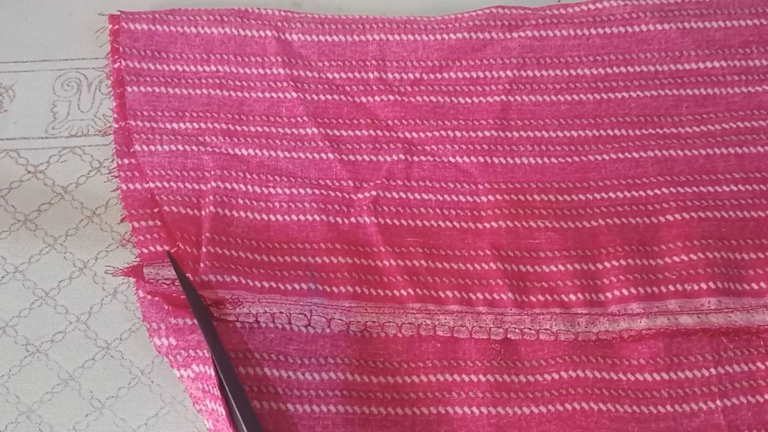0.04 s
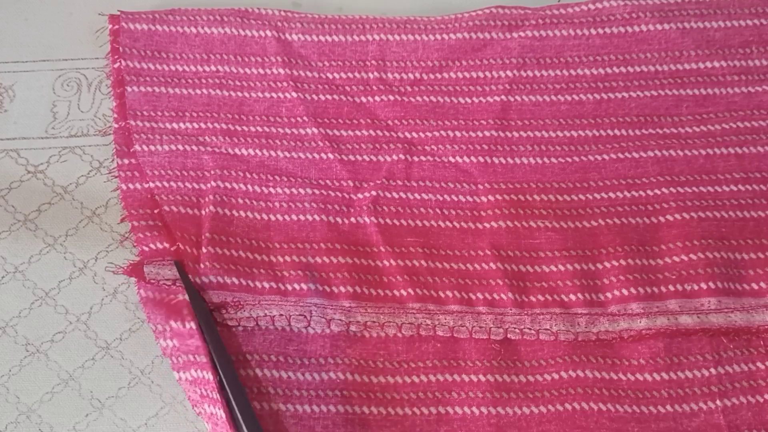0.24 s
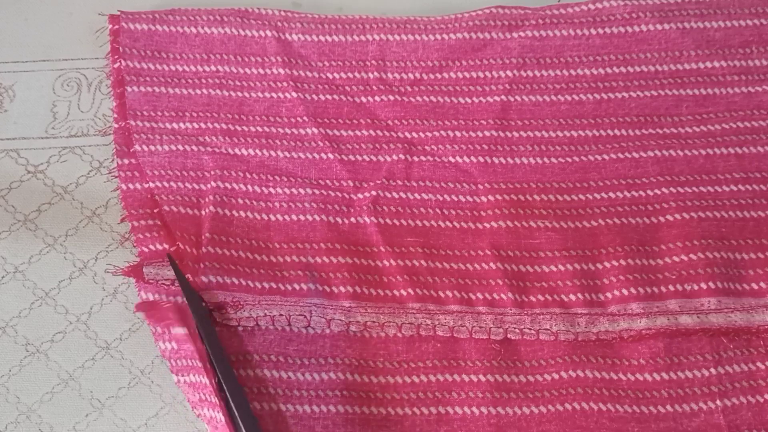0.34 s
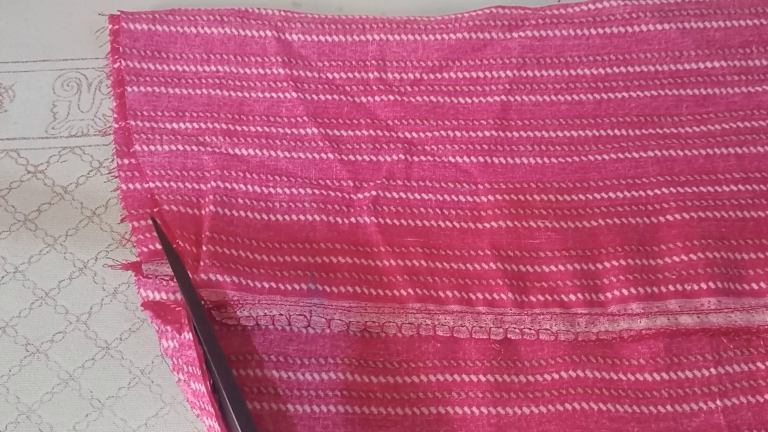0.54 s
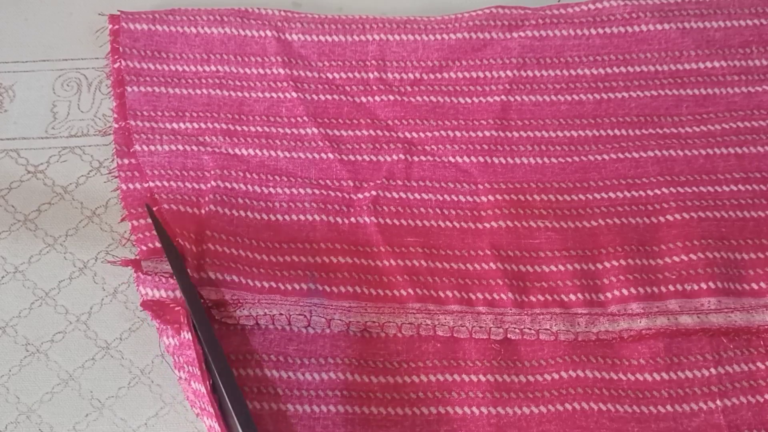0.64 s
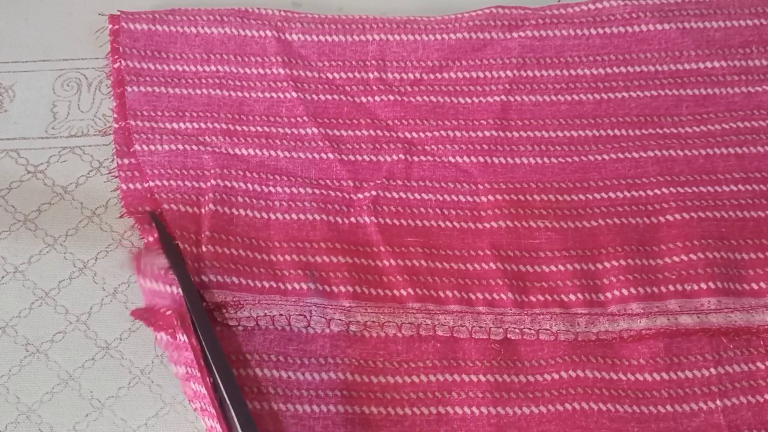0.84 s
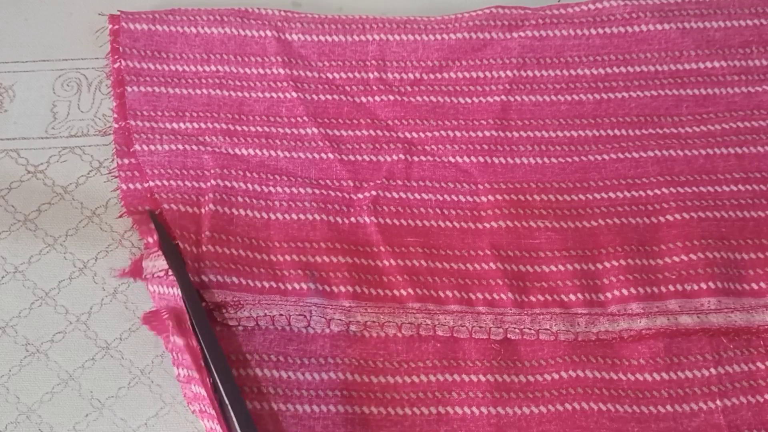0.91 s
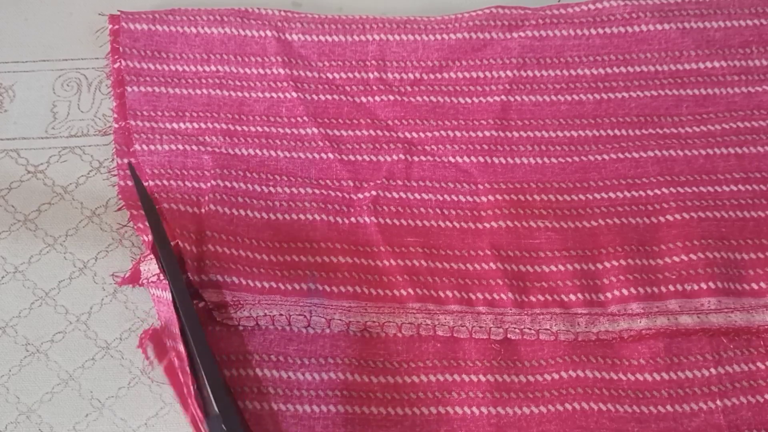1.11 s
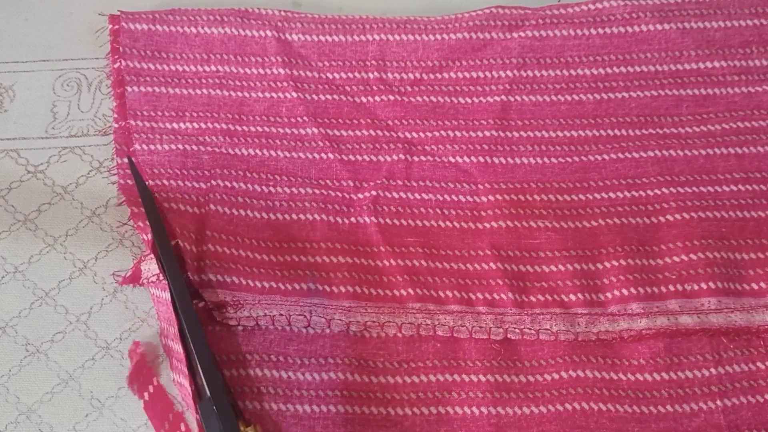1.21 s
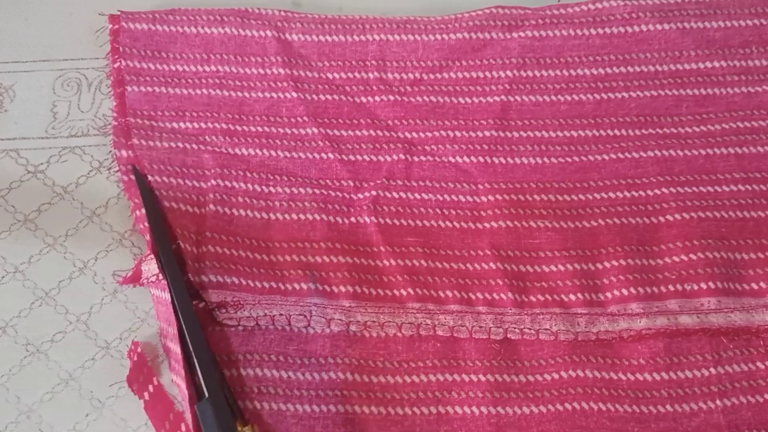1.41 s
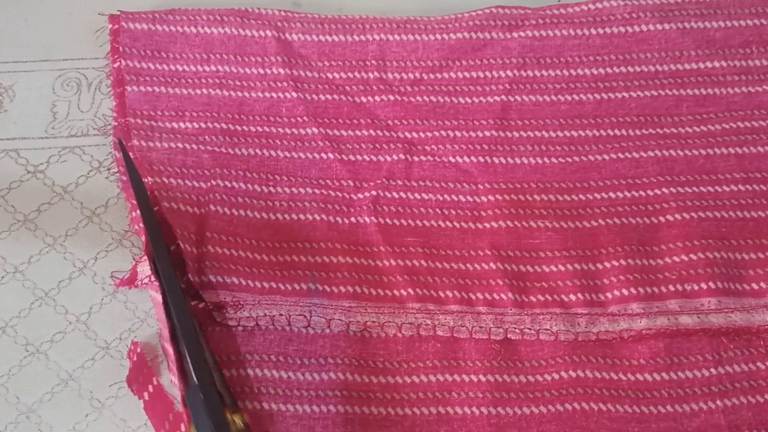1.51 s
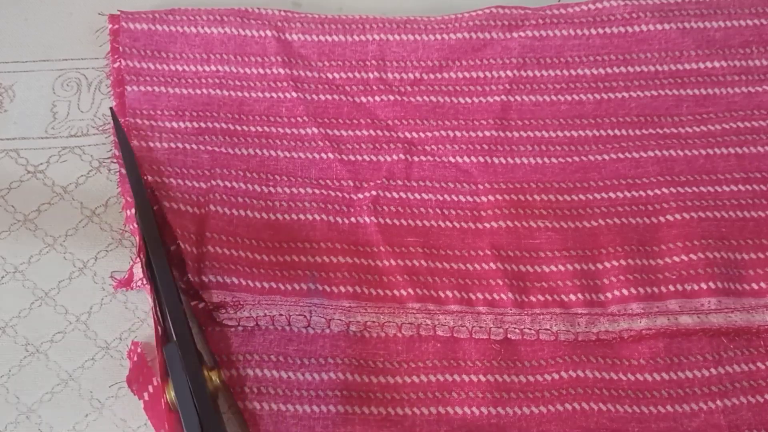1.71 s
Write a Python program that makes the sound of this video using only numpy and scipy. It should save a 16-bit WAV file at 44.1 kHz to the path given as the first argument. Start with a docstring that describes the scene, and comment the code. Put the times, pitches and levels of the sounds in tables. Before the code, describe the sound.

Large steel scissors cut through cloth three times, close by in a small room. Each cut is a crisp, slightly ringing crunch ending in a dull knock on the table, with low rubbing and light ticks between.

```python
"""Large steel scissors cut folded cloth three times, resting on a table in a small room.
The first cut starts at 0.1 s as a run of bites: threads snap, the sliding edges ring the blades,
and the closing knocks the table. The blades open with a faint scrape at 0.4 s and are pushed on,
rubbing the cloth and making the table rumble. The second cut follows at 0.7 s, the third at 1.3 s.
At 1.5 s the blades open once more, two light ticks follow, and the dragging dies down."""
import sys
import numpy as np
from scipy import signal
from scipy.fft import rfft, irfft
from scipy.io import wavfile
from scipy.ndimage import uniform_filter1d

SR = 44100
rng = np.random.default_rng(int(sys.argv[2]) if len(sys.argv) > 2 else 0)


def to_wav(s):
    """Save 16-bit WAV."""
    ch = np.atleast_2d(s).T  # columns
    pcm = np.round(np.clip(ch, -1, 1) * 32767)  # PCM
    wavfile.write(sys.argv[1], SR, pcm.astype(np.int16))


N = 77175
T = np.arange(N) / SR

# bites of the closing blades: t/s, length/s, fade/s, thread level/dB, low ring level/dB,
# main ring level/dB, main ring f/Hz, sizzle level/dB
BITES = [ (0.096, 0.0036, 0.012, -80, -77, -71, 7840, -75),
         (0.124, 0.013, 0.011, -68, -64, -61, 7840, -70.5),
         (0.156, 0.023, 0.0097, -53.5, -58, -57, 7850, -47),
         (.198, 0.011, 0.0047, -54, -48.5, -44, 7720, -47.5),
         (0.211, 0.017, 0.0098, -38, -46.5, -45, 7720, -57),
         (0.275, 0.0087, 0.0036, -40.5, -47.5, -34.5, 7800, -42),
         (0.738, 0.045, 0.0035, -78, -68.5, -63, 7950, -67),
         (0.7843, 0.0027, 0.0011, -43, -49.5, -46, 8160, -68),
         (0.797, 0.037, 0.027, -47.5, -55.5, -61, 8000, -62),
         (0.83, 0.017, 0.0056, -47, -51, -54, 9100, -48),
         (0.876, 0.0092, 0.023, -46, -50, -46.5, 8720, -61),
         (0.894, 0.021, 0.0022, -40.5, -48.5, -45.5, 8970, -40),
         (1.311, 0.012, 0.012, -60, -58, -76, 7500, -57.5),
         (1.331, 0.014, 0.0092, -54.5, -54.5, -61, 9000, -49.5),
         (1.348, 0.018, 0.014, -47.5, -54.5, -43, 9070, -63),
         (1.377, 0.015, 0.0089, -47, -62.5, -40, 8840, -38.5),
         (1.409, 0.0097, 0.0091, -42.5, -57, -44, 9120, -46), ]
# the blades' low ring shifts as their crossing point moves: t/s, f/Hz
LOW_RING_PATH = [(.13, 4316), (.88, 4423), (1.31, 4320), (1.35, 4500), (1.38, 3940)]
# knocks on the table as the blades close: t/s, peak level/dB, contact time/s
KNOCKS = [(.2850, -14.5, 0.002), (.3010, -18, 0.0028), (0.911, -22, 0.0041), (1.371, -32, 0.0013)]
# the blades slide open: peak t/s, rise/s, fall/s, level/dB
OPENINGS = [(0.412, 0.03, 0.032, -70), (1.017, 0.0099, 0.012, -65.5), (1.52, 0.014, 0.016, -63.5)]
# ticks of the pivot and the meeting blades: t/s, level/dB (before halving), fade/s
TICKS = [(0.281, -44.5, 0.0044), (1.162, -36.5, 0.005), (1.584, -46, 0.0023), (1.669, -50.5, 0.0048)]
# scissors and cloth drag on the table: peak t/s, rise/s, fall/s, rumble level/dB, rub level/dB
DRAGS = [ (0.177, 0.025, 0.016, -40.5, -59), (0.22, 0.032, 0.046, -37.5, -53),
         (0.409, 0.072, 0.07, -43, -56), (0.661, 0.09, 0.077, -58.5, -66.5),
         (0.808, 0.04, 0.024, -38, -53.5), (0.848, 0.016, 0.069, -38, -51), (0.906, 0.017, 0.036, -49, -55),
         (1.018, 0.041, 0.083, -44.5, -58), (1.174, 0.014, 0.034, -54, -56.5),
         (1.25, 0.035, 0.023, -46.5, -57.5), (1.327, 0.026, 0.018, -40.5, -60),
         (1.389, 0.029, 0.034, -34, -54), (1.534, 0.059, 0.042, -43, -56),
         (1.578, 0.018, 0.0099, -51.5, -59.5), (1.72, 0.15, 0.63, -59, -71), ]
# the handles buzz: peak t/s, rise/s, fall/s, level/dB
BUZZES = [(0.223, 0.036, 0.0099, -50.5), (0.286, 0.0037, .008, -47), (0.846, 0.013, 0.019, -42),
          (0.909, 0.021, 0.011, -51), (1.251, 0.024, 0.0043, -54.5), (1.397, 0.031, 0.022, -50)]
# the scissors judder on the table: peak t/s, rise/s, fall/s, level/dB, f/Hz
JUDDERS = [(.115, 0.0092, .015, -52, 171), (0.444, 0.05, 0.028, -43.5, 118),
           (0.861, 0.011, 0.019, -33.5, 112), (1.212, 0.027, 0.0091, -38, 116.7),
           (1.436, 0.024, 0.036, -29.5, 124.5)]
# the table's own notes: f/Hz, time to fade by 60 dB/s, relative level/dB
TABLE_NOTES = [(117.2, 0.12, 3), (129.3, 0.039, 3), (171.8, 0.19, -7), (218.6, 0.18, -10.5),
               (323, 0.1, -10), (515, 0.066, -12)]

# Resonances, the pitches at which a part likes to ring: f/Hz, width/Hz, relative level/dB
BLADE_RINGS = [(6570, 200, -16), (9660, 310, -14.5)]  # on either side of the main ring
EDGE_RINGS = [(13750, 980, -4), (15060, 660, -4)]  # the cutting edges
OPENING_RINGS = [(7350, 180, 10.3), (7950, 200, 6.7), (8960, 590, 1.5)]  # the parting blades
HANDLE_RINGS = [(609, 20, -3), (689.4, 30.2, -3)]  # the handles

# Tone curves, how strong a sound is from low to high: f/Hz, relative level/dB
THREAD_TONE = [(1700, -11.5), (2500, -9), (3900, -2), (5600, -2.5), (6800, 7), (8500, 4.5), (10000, -6),
               (11000, -12), (12200, -28), (13000, -20), (15500, -1.5)]  # snapping threads
SCRAPE_TONE = [(2000, -18), (3900, 10), (6000, 4), (11500, -12), (14500, 4)]  # steel sliding on steel
CLOTH_TONE = [(270, 2.5), (350, 4), (500, -3), (780, -6.5), (1100, -12), (1600, -18), (2200, -20.5)]  # rubbing cloth
FIBRE_TONE = [(2300, -10), (3800, -2.5), (8000, -12.5), (11500, -19), (15000, -14)]  # the hiss of its fibres
ECHO_TONE = [(60, -33), (250, -8), (700, 2), (2500, 4.5), (8000, -1.5), (15000, -6)]  # the room's echo
QUIET_TONE = [(35, -3), (70, 1), (115, 4.5), (350, -6), (700, -21.5), (4000, -24), (15500, -36.5)]  # the room's background noise
TICK_TONE = [(400, 19), (800, 5), (2500, -11), (7000, -16.5), (15000, -41)]
RUMBLE_TONE = [(45, 2), (85, -15.5), (115, -0.5), (700, -16)]

CLICKS_PER_S, CLICK_SCATTER_DB = 9000, 4
BITE_ATTACK_S, BITE_SWELL_DB = 0.003, 10  # pressure grows through a bite
SIZZLE_POWER = 1.4  # the sizzle grows faster than the pressure
LOW_WIDTH_HZ, MAIN_WIDTH_HZ = 210, 176
REST_HZ, WIDENING = 7900, 0.33  # the main ring widens by this much per Hz above its rest
OVERTONE_RATIO, OVERTONE_WIDTH_HZ, OVERTONE_DB = 1.68, 100, -13  # climbs with the main ring
RIPPLE_DB, RIPPLE_SPACING_HZ = 9, 168.5
OPENING_RING_DB, FIBRE_DB = 3.5, -12.5  # compared with the scrape and with the cloth
TABLE_LOW_HZ = 87  # the table gives off little sound below this
ECHO_S, ECHO_DB, QUIET_DB = 1, -13, -66  # the echo fades by 60 dB in ECHO_S
RING_ECHO_SHARE = 0.048  # the thin rings carry less far into the room


def cutting():
    """In each bite threads snap and the blades ring, harder and harder until the cloth gives."""
    snaps = colour(crackle(), THREAD_TONE)
    sizzle = resonate(crackle(), EDGE_RINGS)
    friction = crackle()
    crunch, rings = 0, 0
    for at, length, fade, snap_db, low_db, main_db, main_hz, sizzle_db in BITES:
        t = T - at
        pressure = np.clip(t / BITE_ATTACK_S, 0, 1)
        pressure *= undb(BITE_SWELL_DB * (np.clip(t / length, 0, 1) - 1))
        pressure *= np.exp(-np.maximum(t - length, 0) / fade)  # the cloth gives
        low_hz = np.interp(at, *np.array(LOW_RING_PATH).T)
        low_ring = steady(resonate(friction, [(low_hz, LOW_WIDTH_HZ, 0)]), span_s=0.012)
        width = MAIN_WIDTH_HZ + WIDENING * max(main_hz - REST_HZ, 0)
        overtone = (main_hz * OVERTONE_RATIO, OVERTONE_WIDTH_HZ, OVERTONE_DB)
        resonances = BLADE_RINGS + [(main_hz, width, 0), overtone]
        main_ring = steady(resonate(friction, resonances), span_s=0.0084)
        crunch += pressure * undb(snap_db) * steel_ripple(snaps)
        crunch += pressure ** SIZZLE_POWER * undb(sizzle_db) * sizzle
        rings += pressure * (undb(low_db) * low_ring + undb(main_db) * main_ring)
    return crunch, rings


def steel_ripple(x):
    """The steel's many small resonances make some pitches louder and others softer, at random."""
    f = np.arange(N // 2 + 1) * SR / N
    heights = rng.standard_normal(512)
    ripple_db = RIPPLE_DB * np.interp(f / RIPPLE_SPACING_HZ, np.arange(len(heights)), heights)
    return unit(irfft(rfft(x) * undb(ripple_db), N))


def knocks():
    """The closing scissors push on the table and ring it; a longer contact sounds duller."""
    ring, out = table_ring(), 0
    for at, db, contact in KNOCKS:
        push = np.sin(np.pi * np.clip((T - at) / contact, 0, 1))
        thud = signal.fftconvolve(push, ring)[:N]
        out += undb(db) * thud / np.abs(thud).max()
    return out


def table_ring():
    """After one sharp push the table sounds a few low notes that quickly fade."""
    ring = sum(undb(db) * np.sin(2 * np.pi * hz * T) * die_away(fade) for hz, fade, db in TABLE_NOTES)
    return cut_bass(ring, TABLE_LOW_HZ, order=2)


def opening():
    """As the blades part, steel slides lightly on steel and sings faintly."""
    scrape = unit(colour(crackle(), SCRAPE_TONE))
    ring = undb(OPENING_RING_DB) * resonate(crackle(), OPENING_RINGS)
    return swells(OPENINGS) * (scrape + ring)


def ticks():
    """The pivot and the meeting blades tick: sudden, very short bursts of noise."""
    loudness = sum(undb(db) * (T > at) * np.exp(-np.abs(T - at) / fade) for at, db, fade in TICKS)
    return loudness * steady(colour(crackle(), TICK_TONE), span_s=0.0026) / 2


def dragging():
    """The table rumbles and the cloth rubs as the scissors are pushed along."""
    weight = swells((at, rise, fall, db) for at, rise, fall, db, _ in DRAGS)
    rub = swells((at, rise, fall, db) for at, rise, fall, _, db in DRAGS)
    shaking = signal.fftconvolve(rng.standard_normal(2 * N), table_ring())[N:2 * N]
    rumble = steady(colour(shaking, RUMBLE_TONE), span_s=0.0357)
    cloth = steady(colour(crackle(), CLOTH_TONE), span_s=0.078)
    fibres = undb(FIBRE_DB) * unit(colour(crackle(), FIBRE_TONE))
    return weight * rumble + rub * (cloth + fibres)


def judder():
    """The juddering scissors keep one low note of the table swinging: it swells and dies."""
    return sum(undb(db) * swell(at, rise, fall) * np.sqrt(2) * np.sin(2 * np.pi * hz * (T - at))
               for at, rise, fall, db, hz in JUDDERS)


def handle_buzz():
    """The handles buzz when pressed hard, jolted or shifted in the hand."""
    return swells(BUZZES) * steady(resonate(crackle(), HANDLE_RINGS), span_s=0.025)


def room_echo(x):
    """The room's many reflections blur into one short, fading tail."""
    tail = rng.standard_normal(N) * die_away(ECHO_S) * np.clip(T / 0.0043, 0, 1)
    echo = signal.fftconvolve(x, tail / np.linalg.norm(tail))[:N]
    return undb(ECHO_DB) * colour(echo, ECHO_TONE)


def room_quiet():
    """A faint, low, even noise fills the room."""
    return undb(QUIET_DB) * unit(colour(rng.standard_normal(N), QUIET_TONE))


def crackle():
    """Thousands of tiny clicks a second, each of a random size."""
    hits = rng.random(N) < CLICKS_PER_S / SR
    signs = np.sign(rng.standard_normal(N))
    return hits * signs * undb(CLICK_SCATTER_DB * np.minimum(rng.exponential(size=N), 5))


def colour(x, tone):
    """Shape a sound with a tone curve, falling steeply beyond its ends."""
    hz, db = np.array(tone, float).T
    f = np.maximum(np.arange(N // 2 + 1) * SR / N, 1)
    falloff = np.minimum(f / hz[0], 1) ** 4 * np.minimum(hz[-1] / f, 1) ** 4
    return irfft(rfft(x) * falloff * undb(np.interp(np.log(f), np.log(hz), db)), N)


def resonate(x, resonances):
    """Let a sound ring at each resonance; the sum has an average strength of 1."""
    out = 0
    for hz, width, db in resonances:
        b, a = signal.iirpeak(min(hz, .45 * SR), hz / (2 * width), fs=SR)
        out += undb(db) * signal.lfilter(b, a, signal.lfilter(b, a, x))  # twice, for steep sides
    return unit(out)


def cut_bass(x, hz, order):
    """Weaken everything below hz; a higher order cuts more steeply."""
    return signal.sosfilt(signal.butter(order, hz, "high", fs=SR, output="sos"), x)


def steady(x, span_s):
    """Even out swells in a noise that are slower than span_s."""
    return x / np.sqrt(uniform_filter1d(x ** 2, max(int(span_s * SR), 2)) + 1e-12)


def swell(at, rise, fall):
    """A smooth rise to 1 at a given moment, then a fall."""
    distance = (T - at) / np.where(T < at, rise, fall)
    return np.exp(1 - np.hypot(distance * 1.566, 1))


def swells(rows):
    """Add several swells into one loudness curve."""
    return sum(undb(db) * swell(at, rise, fall) for at, rise, fall, db in rows)


def die_away(seconds):
    """A fade that drops by 60 dB in the given time."""
    return np.exp(-np.log(1000) * T / seconds)


def undb(db):
    """Turn decibels into a number to multiply by."""
    return 10 ** (np.asarray(db) / 20)


def unit(x):
    """Scale to an average strength (rms) of 1."""
    return x / np.sqrt(np.mean(x ** 2))


def scene():
    """Scissors, cloth and table over the quiet of the room."""
    crunch, rings = cutting()
    near = crunch + opening() + ticks() + dragging() + handle_buzz() + judder() + knocks()
    return (near + rings + room_quiet() + room_echo(near + RING_ECHO_SHARE * rings))[None]


def record(dry):
    """The microphone thins the deep bass and cuts the highest treble."""
    thin = cut_bass(dry, hz=48, order=3)
    treble_cut = signal.ellip(10, .2, 80, 15420, fs=SR, output="sos")  # above 15420 Hz
    return signal.sosfilt(treble_cut, thin)


dry = scene()
out = record(dry)
to_wav(out)
```